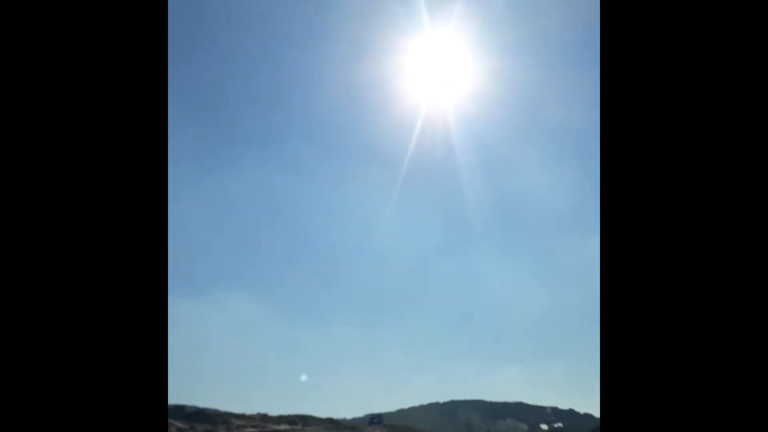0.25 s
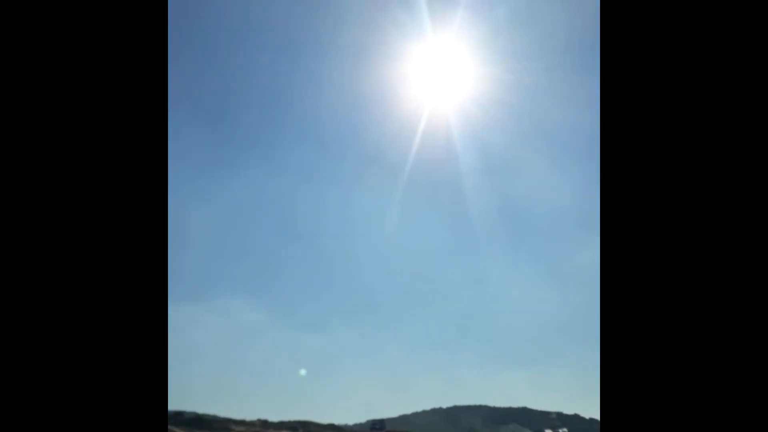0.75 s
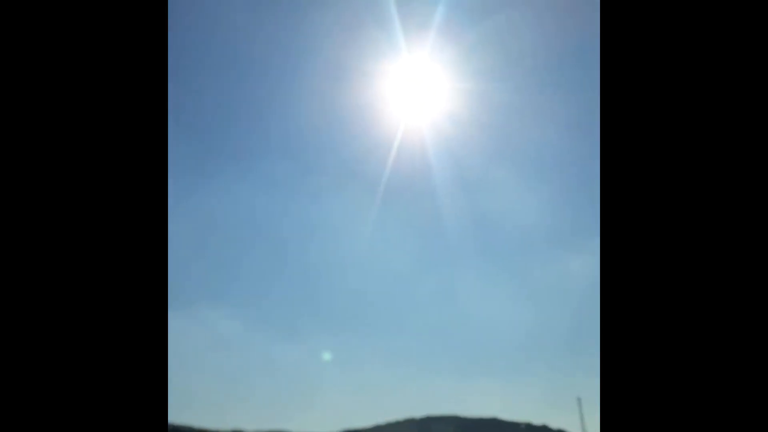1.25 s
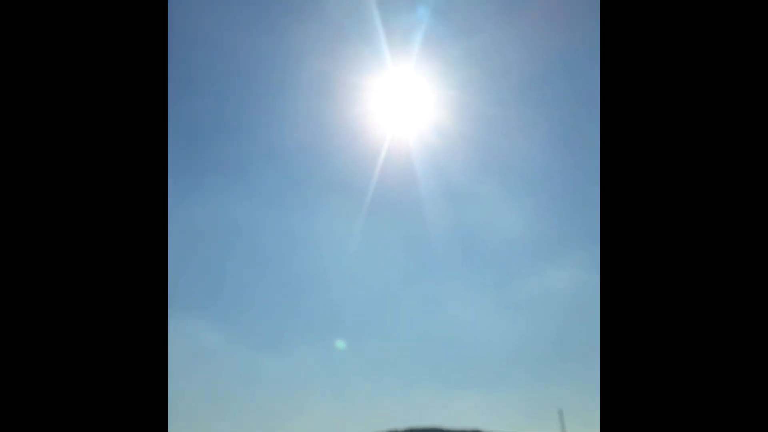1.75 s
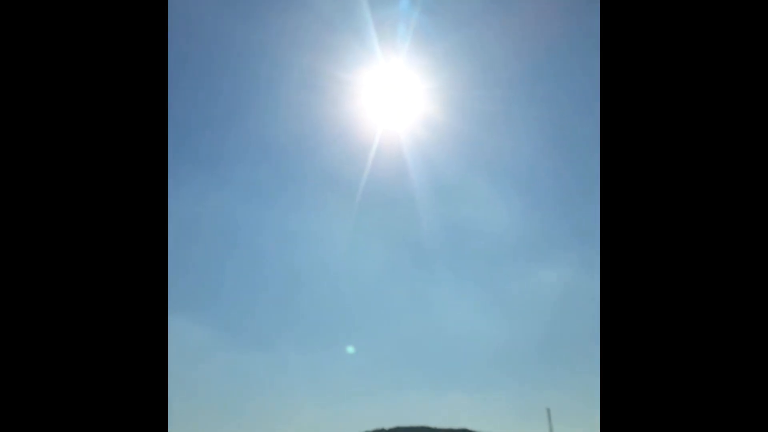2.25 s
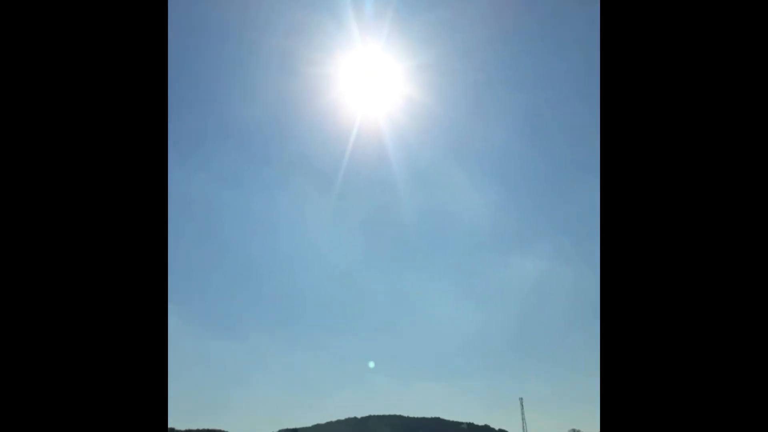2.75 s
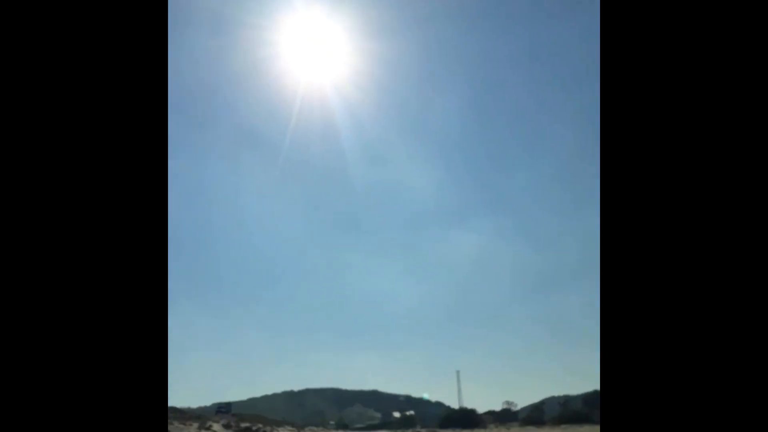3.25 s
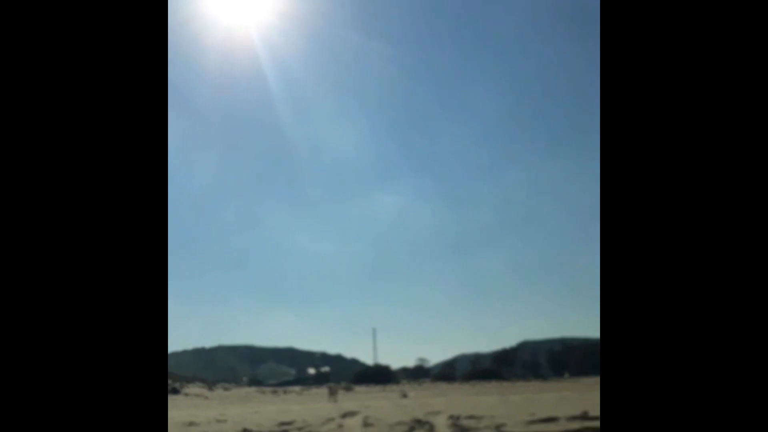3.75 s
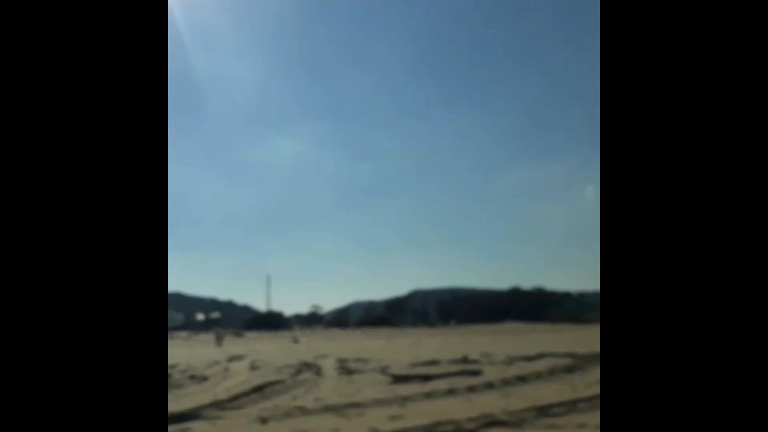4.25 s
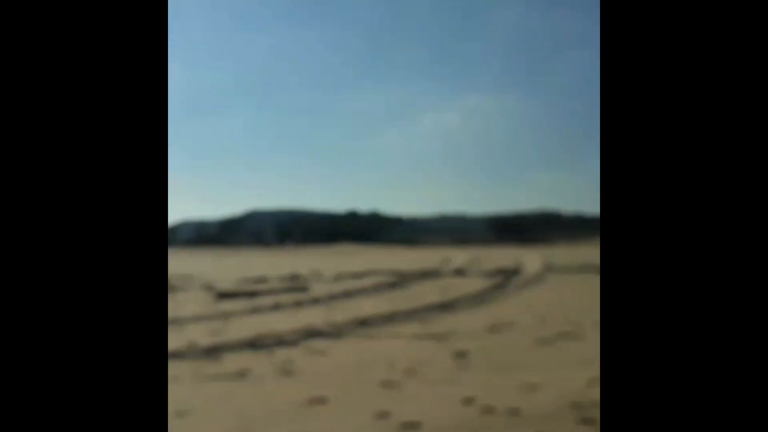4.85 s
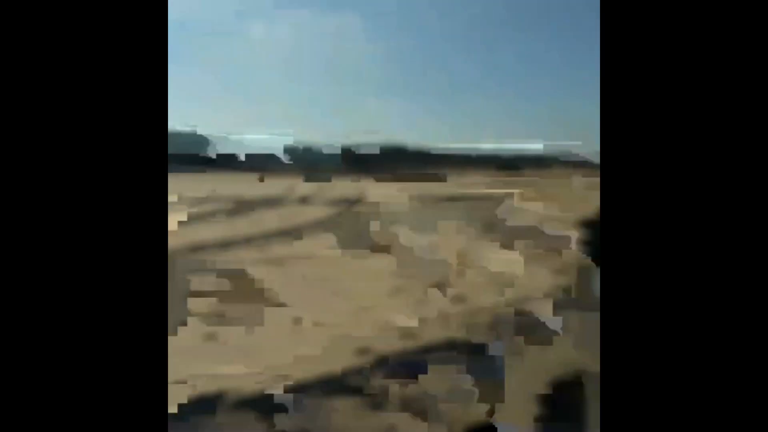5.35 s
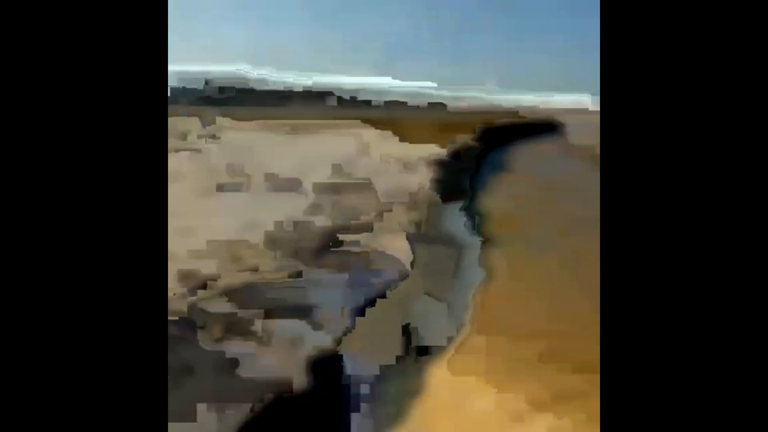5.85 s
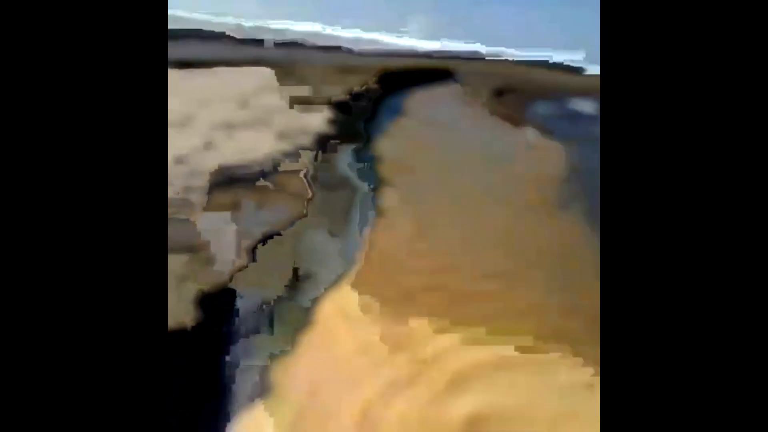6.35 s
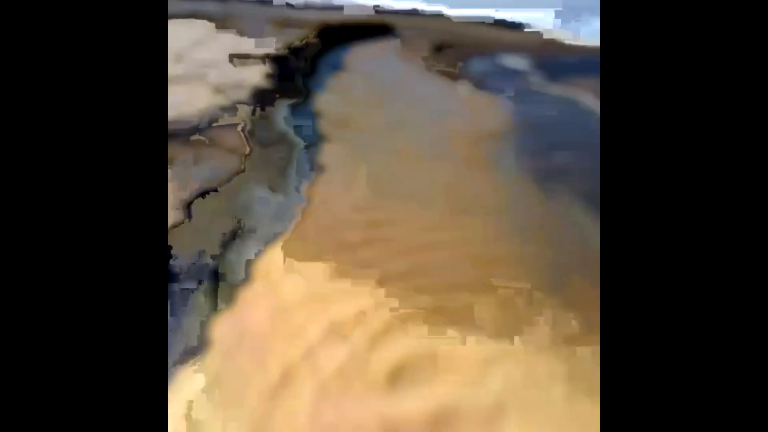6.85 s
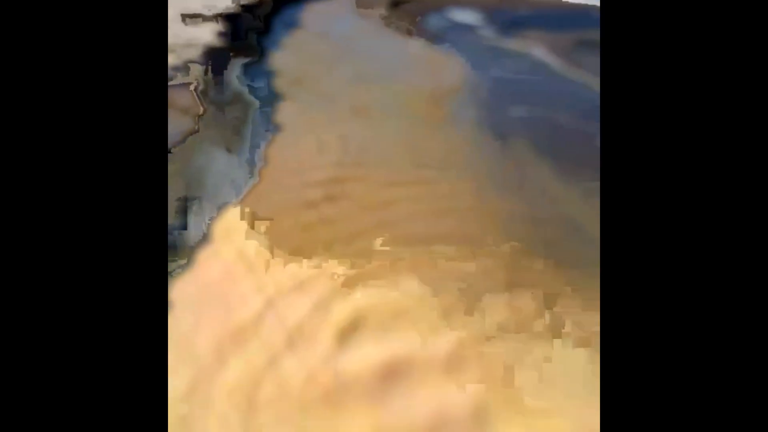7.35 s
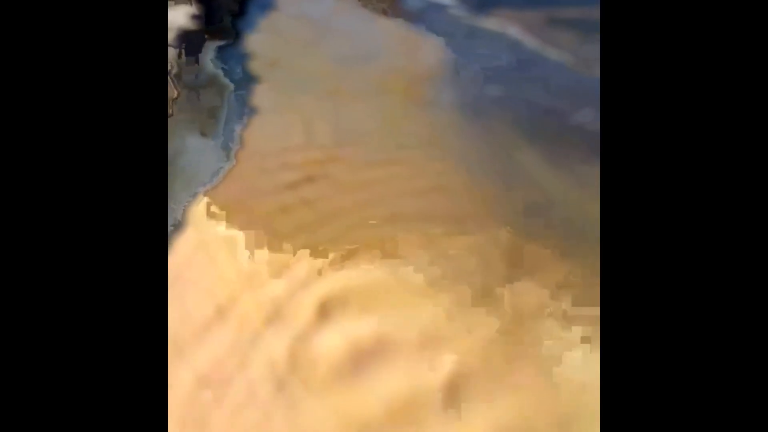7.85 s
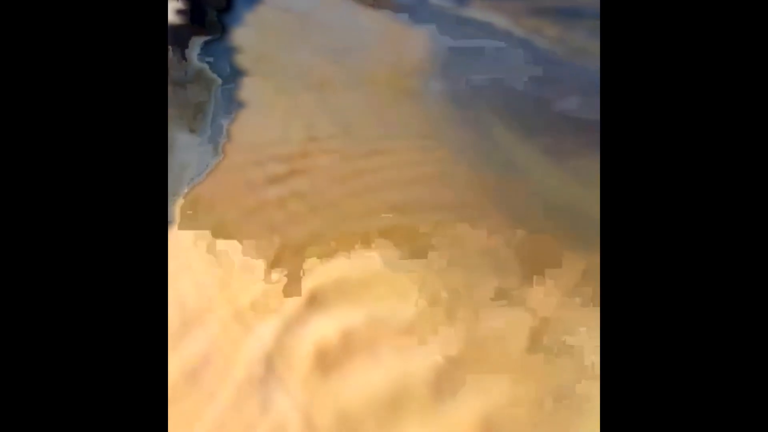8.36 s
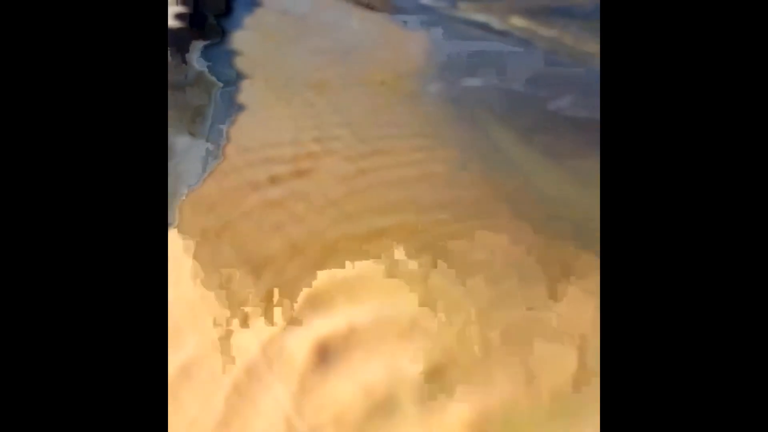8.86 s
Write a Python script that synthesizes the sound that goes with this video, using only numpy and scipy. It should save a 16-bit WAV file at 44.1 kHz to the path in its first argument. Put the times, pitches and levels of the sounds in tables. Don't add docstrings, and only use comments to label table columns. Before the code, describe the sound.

On an open sandy beach, distant surf roars continuously with a soft, muffled hiss. Wind thumps hard against a small handheld microphone in the first second, then eases to light rumbles. A sharp casing creak snaps early on, and sand grains tick faintly. After a calmer middle, gusts return in a dense cluster of low thuds and keep rumbling to the end.

```python
import sys
import numpy as np
from scipy import signal
from scipy.fft import rfft, irfft, next_fast_len
from scipy.io import wavfile
from scipy.ndimage import uniform_filter1d

SR = 44100
rng = np.random.default_rng(int(sys.argv[2]) if len(sys.argv) > 2 else 0)


def to_linear_factor(level_db):
    exponent = np.asarray(level_db, float) / 20
    return 10 ** exponent


def generate_wav(sig):
    pcm = np.round(np.clip(np.atleast_2d(sig).T, -1, 1) * 32767).astype(np.int16)
    wavfile.write(sys.argv[1], SR, pcm)


N = 402191
TIME = np.arange(N) / SR
HZ = np.maximum(np.fft.rfftfreq(next_fast_len(N), 1 / SR), 1)

# time in seconds, roar level in dB, foam relative to the roar in dB.
WAVES = [(0, -37, -4.5), (.6, -36, -5.5), (1.2, -36.5, -4), (1.6, -35.3, -3), (2.2, -36.5, -2),
         (2.85, -35, -3), (3.3, -37, 0), (3.65, -36, -3.5), (4.0, -37.5, 0), (4.5, -37.5, 0.5),
         (5.0, -37.5, -0.5), (5.45, -38.5, -1.5), (5.9, -37.5, -2.8), (6.35, -38, -3), (6.8, -36, -3),
         (7.7, -36.5, -7), (8.6, -39, -2), (9.12, -37.5, -5)]
# frequency in Hz, density in dB per Hz.
BREAKER_COLOUR = [(25, -6), (45, -0.5), (100, -3.5), (200, 0.5), (400, 0), (900, -1.5), (1300, -7),
                  (1900, -11.5), (3000, -11.5), (8000, -8)]
# time in seconds, boost in dB, length in ms.
SAND_SPRAYS = [
    (.27, 8, 15),
    (.575, 9, 20),
    (.66, 6.5, 24),
    (.71, 11, 9.1),
    (3.1, 7.5, 20),
    (4.43, 3.5, 22),
    (4.67, 2.5, 27),
]
# centre in seconds, rumble level in dB, half length in seconds,
# share of small fast eddies in dB.
GUSTS = [(0.066, -30.5, .05, -13.5), (.37, -21.5, .045, -11.5), (.72, -24, 0.074, -6.5),
         (0.867, -32, 0.08, -10), (0.989, -30, 0.046, -2), (1.346, -25, .07, -12.5),
         (.505, -28.5, .03, -15.5), (1.79, -40.5, 0.14, -3), (2.128, -38, .06, -7),
         (2.392, -36.5, .05, -9.5), (2.664, -29, 0.18, -11), (2.93, -32.5, 0.094, -8.5),
         (3.17, -36.5, 0.094, -5), (3.52, -27.5, 0.09, -9), (3.79, -34, .13, -13.5),
         (4.752, -44.5, .15, -5), (5.365, -34.5, 0.029, -5.5), (5.628, -40, 0.15, 4), (5.92, -33.5, 0.2, 1),
         (6.15, -24.5, .12, -3.5), (6.429, -22, 0.17, -3), (6.962, -26.5, 0.21, -9.5),
         (7.27, -34.5, 0.14, -8), (7.6, -32.5, 0.076, -3.5), (7.781, -30.5, .05, -8.5),
         (8.03, -28.5, 0.15, -9.5), (8.38, -32.5, 0.19, -6.5), (8.638, -30, .08, -2.5),
         (8.839, -27, 0.15, -12), (9.066, -28, .1, -4)]
# frequency in Hz, density in dB per Hz.
EDDY_COLOUR = [(8, -19.5), (15, -16.5), (30, -1), (50, 1), (80, -4), (110, -6), (170, -18), (300, -35.5)]
# time in seconds, peak level in dB, pitch in Hz.
THUMPS = [(0.377, -23.5, 56), (.676, -16, 67), (0.704, -12, 60.3), (0.743, -22, 42), (0.836, -18, 48.7),
          (.93, -19.5, 56), (0.977, -15, 63), (2.662, -28, 55), (2.999, -24.5, 52), (3.579, -22.5, 52),
          (5.873, -22.5, 57), (6.053, -17.5, 56), (6.09, -20, 78), (6.157, -21, 77.5), (6.27, -18.5, 65),
          (6.349, -22, 69.6), (6.415, -17, 50.7), (6.465, -17.5, 55), (6.505, -19, 65), (6.533, -13.5, 62),
          (6.569, -17.5, 73), (6.593, -16.5, 43), (6.907, -18.5, 49), (6.966, -22.5, 53.7),
          (7.016, -18, 54.5), (7.106, -23, 55), (8.046, -19.5, 55), (8.138, -17.5, 50), (8.464, -25.5, 54),
          (9.05, -24.5, 77.6)]
# time in seconds, peak level in dB, pitch in Hz.
SAND_TICKS = [(.0967, -49, 6100), (.0967, -49, 5050), (.2693, -49, 6100), (.2693, -47, 5050),
              (.6479, -51, 6100), (.6619, -52, 5050), (0.791, -38, 3530), (1.6601, -53, 6060),
              (2.0198, -45, 6100), (2.1261, -42, 3600), (2.2727, -46, 6100), (2.9462, -53, 6100),
              (3.0957, -49, 5050), (3.273, -47, 5050), (3.6642, -49, 3600), (3.7125, -51, 5050),
              (4.0382, -48, 3600), (4.4059, -54, 6100), (4.4223, -55, 7450), (4.4448, -55, 7450),
              (4.4453, -43, 6100), (4.5086, -41, 5050), (4.5381, -39, 3600), (4.6723, -54, 7450),
              (5.1392, -50, 5050), (7.9164, -53, 3600), (7.9179, -50, 6100), (7.9179, -51, 5050),
              (8.6178, -48, 6130), (8.7076, -51, 3600)]
# time in seconds, peak level in dB, pitch in Hz, ring t60 in ms.
CASING_CREAKS = [(.7692, -28, 2470, 12), (1.0113, -27, 2700, 12), (1.6317, -21, 2780, 9),
                 (1.63278, -19.5, 2780, 9), (1.6353, -27, 2700, 10), (1.632, -30, 1750, 9),
                 (1.632, -29, 2430, 12), (4.0073, -31, 2300, 10), (5.0448, -30, 2500, 10),
                 (5.6194, -30, 2380, 10), (8.2856, -27, 2150, 14)]
# frequency in Hz, gain in dB.
PORT = [(100, 1.5), (2400, -1), (2800, -5.5), (3350, -21), (3700, -25), (4000, -34.5), (4400, -29.5),
        (5600, -25), (6200, -30.5), (6700, -34.5), (8400, -35.5)]
# frequency in Hz, level in dB.
WHINE = [(11025, -91.5), (12403, -104)]


def read(table, hz):
    table_hz, db = np.transpose(table)
    return np.interp(np.log(hz), np.log(table_hz), db)


def shape(x, gain):
    size = next_fast_len(N)
    return irfft(rfft(x, size) * gain, size)[:N]


def unit(x, lo_hz, hi_hz):
    return x / np.std(shape(x, (HZ > lo_hz) & (HZ < hi_hz)))


def walk(rate):
    hold = int(SR / rate)
    steps = np.repeat(rng.standard_normal(N // hold + 1), hold)
    return 1.3 * uniform_filter1d(uniform_filter1d(steps, hold), hold)[:N]


def surf():
    s, roar, foam = np.transpose(WAVES)
    roar_db, foam_db = np.interp(TIME, s, roar), np.interp(TIME, s, foam)
    rush_db = foam_db - foam_db.mean()

    turn_s, turn_span_s = 6.1, 0.44
    turn = .5 * np.tanh((TIME - turn_s) / turn_span_s)
    turn = turn - turn.mean()
    boom_db = 4.5 * turn - 0.23 * (roar_db - roar_db.mean())
    fizz_db = -6.5 * turn + .9 * rush_db
    for s, db, ms in SAND_SPRAYS:
        fizz_db = fizz_db + db * np.exp(-((TIME - s) * 1000 / ms) ** 2)

    bursts_per_s = 500
    bursts = (rng.random(N) < bursts_per_s / SR) * rng.standard_normal(N)
    bursts = bursts / np.std(bursts)
    out, shared, air = 0, walk(2.3), to_linear_factor(read(BREAKER_COLOUR, HZ))
    for k, hz in enumerate(25 * 2 ** (np.arange(27) / 3)):
        near = np.clip(np.log2(hz / 1600) / 0.73, 0, 1)
        bubbles = rng.standard_normal(N) + .5 * near * np.roll(bursts, k // 2 * N // 27)
        window = np.cos(np.pi / 2 * np.clip(3 * np.log2(HZ / hz), -1, 1))
        band = shape(bubbles, window * air)
        shared = .8 * shared + .6 * walk(6)
        tilt_db = boom_db * np.interp(hz, [172, 250, 420, 810], [0.2, 1, 0.5, 0])
        tilt_db = tilt_db + rush_db * np.interp(hz, [746, 1230, 2600, 3300, 4200], [0.023, 1, 0.86, 0.47, 0.16])
        tilt_db = tilt_db + fizz_db * np.interp(hz, [3300, 4200, 6000, 7500], [0.081, 0.46, 0.84, 0.11])
        swell_db = .5 * shared + (0.26 + 0.78 * near) * walk(14)
        out = out + band * to_linear_factor(tilt_db + swell_db)
    return unit(out, 463, 996) * to_linear_factor(roar_db)


def gusts():
    calm_db, calm_eddies_db = -47.5, 1
    power = to_linear_factor(2 * calm_db)
    share = power * calm_eddies_db
    for s, db, half_s, eddies_db in GUSTS:
        gust = to_linear_factor(2 * db) * np.exp(-2 * ((TIME - s) / half_s) ** 2)
        power = power + gust
        share = share + gust * eddies_db
    return 10 * np.log10(power), share / power


def add_thumps(rumble):
    half_turns, start_turns, scatter_turns = .48, -.1, .3
    turns = start_turns + scatter_turns * (rng.random(len(THUMPS)) - .5)
    for (s, db, hz), turn in zip(THUMPS, turns):
        span = slice(int((s - .06) * SR), int((s + .06) * SR))
        t = TIME[span] - s
        swell = np.exp(-(t * hz / half_turns) ** 2)
        swing = to_linear_factor(db) * swell * np.cos(2 * np.pi * (hz * t + turn))
        rumble[span] = rumble[span] * (1 - .8 * swell) + swing
        front = np.exp(-(t / 0.0032) ** 2) * np.sin(2 * np.pi * (2.73 * hz * t + turn))
        rumble[span] += to_linear_factor(2 * db + 6.5) * front
    return rumble


def wind():
    rumble_db, bright_db = gusts()
    flutter = rng.standard_normal(N) * to_linear_factor(1.1 * walk(33))
    eddies = unit(shape(flutter, to_linear_factor(read(EDDY_COLOUR, HZ))), 26, 110)
    small = shape(eddies, 1 / (1 + (75 / HZ) ** 4))
    cap_db = -30
    rumble_db = rumble_db - .6 * np.maximum(rumble_db - cap_db, 0)
    small_gain = to_linear_factor(0.79 * (bright_db - bright_db.mean())) - 1
    return add_thumps((eddies + small * small_gain) * to_linear_factor(rumble_db - 0.06))


def taps(table):
    out, t = np.zeros(N), TIME[:1000]
    for s, db, hz, t60_ms in table:
        decay = np.exp(-np.log(1000) * t * 1000 / t60_ms)
        ring = np.sin(2 * np.pi * hz * t) * decay * np.minimum(t / .0003, 1)
        start = int(s * SR)
        out[start:start + len(t)] += to_linear_factor(db - read(PORT, hz)) * ring
    return out


def sand_ticks():
    t60_ms, lift_db = 6, 2.5
    return to_linear_factor(lift_db) * taps([(*tick, t60_ms) for tick in SAND_TICKS])


def casing_creaks():
    return taps(CASING_CREAKS)


def scene():
    return (surf() + wind() + sand_ticks() + casing_creaks())[None]


def electronics(x):
    skirt = (HZ > 10300) * np.clip((13000 - HZ) / 2000, 0, 1)
    x = x + to_linear_factor(-89.5 + walk(90)) * shape(rng.standard_normal(N), skirt)
    x = x - 0.065 * np.exp(-TIME / 0.00023)
    for hz, db in WHINE:
        wobble = 1 + 0.14 * walk(80)
        x = x + np.sqrt(2) * to_linear_factor(db) * wobble * np.sin(2 * np.pi * hz * TIME + 1)
    return x


def band_limit(x):
    return signal.sosfilt(signal.butter(12, 12985, fs=SR, output="sos"), x)


def record(dry):
    hiss_db, top_hz = -67, 8480
    hiss = to_linear_factor(hiss_db) * rng.standard_normal(N)
    capsule = .4 * np.tanh(dry[0] / .4)
    port = shape(capsule, to_linear_factor(read(PORT, HZ)))
    x = electronics(shape(port + hiss, HZ < top_hz))
    return band_limit(x[None] - .0006)


dry = scene()
out = record(dry)
generate_wav(out)
```